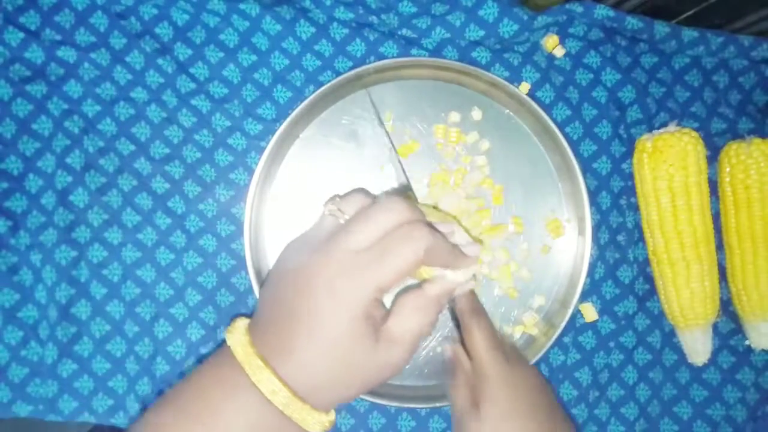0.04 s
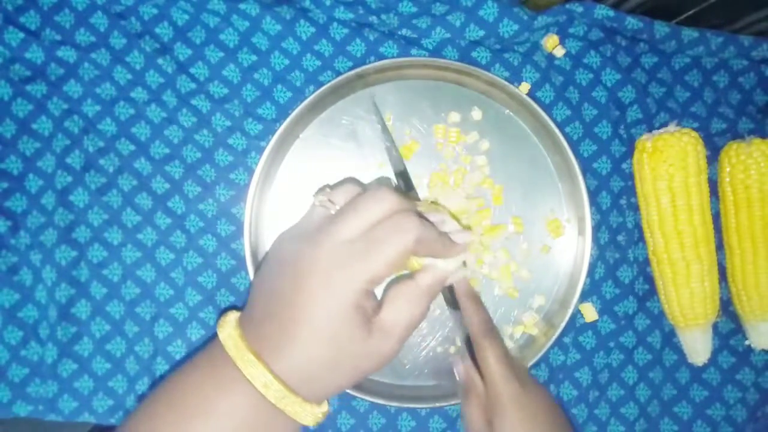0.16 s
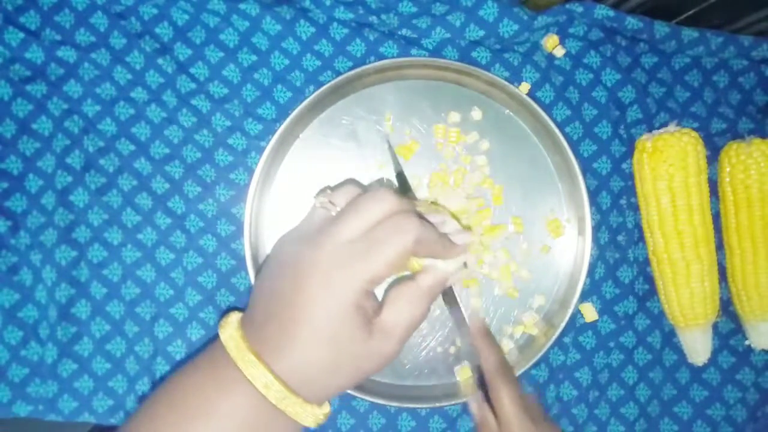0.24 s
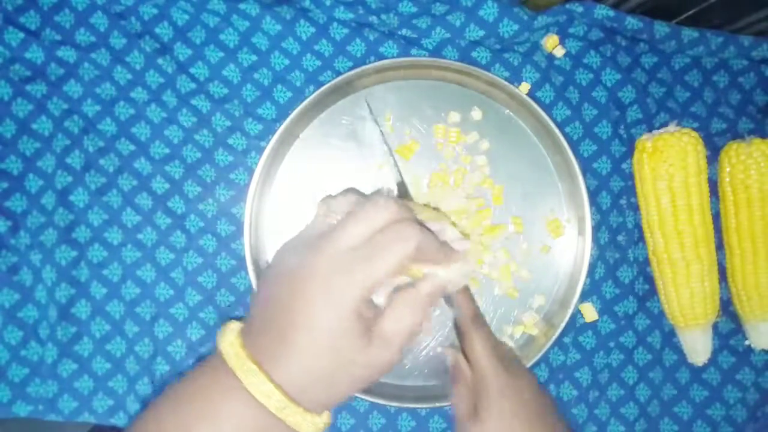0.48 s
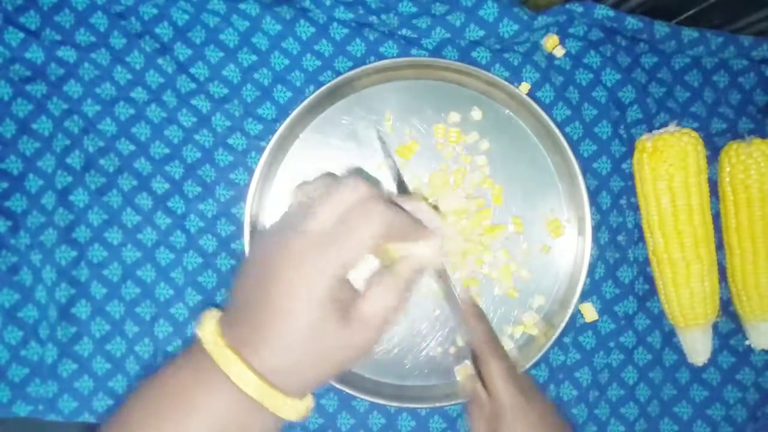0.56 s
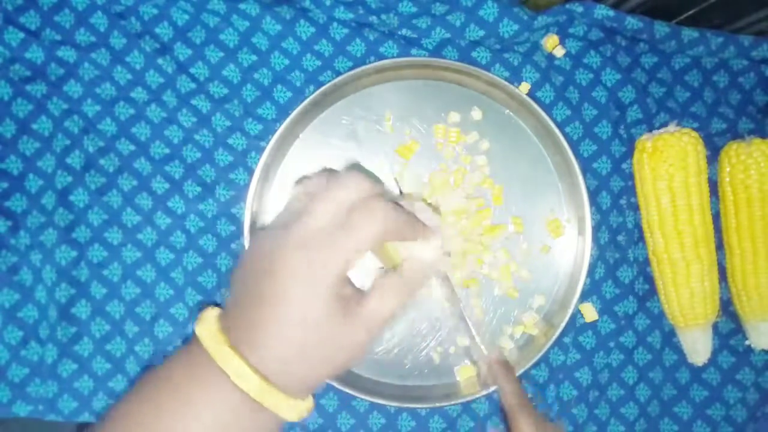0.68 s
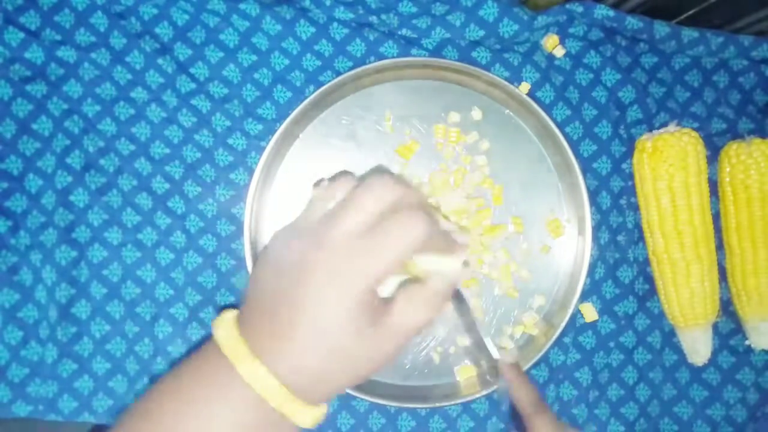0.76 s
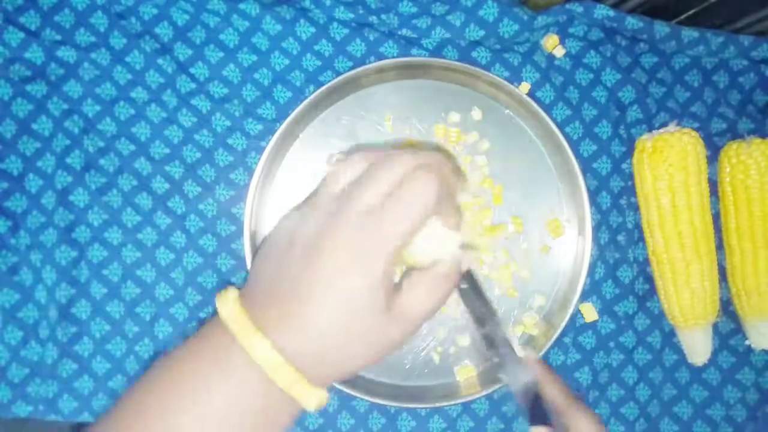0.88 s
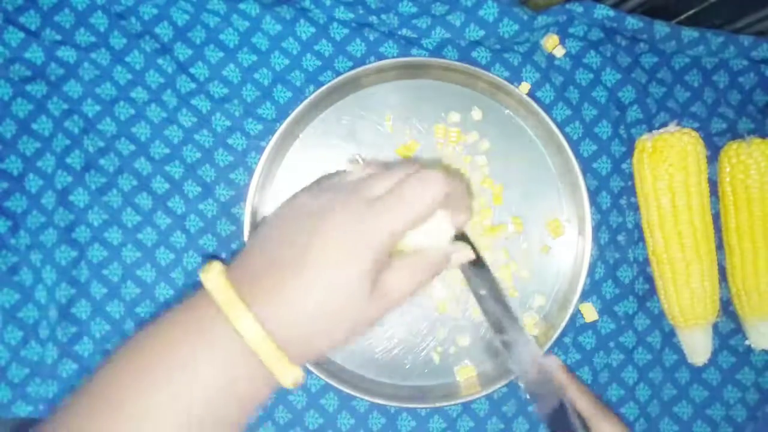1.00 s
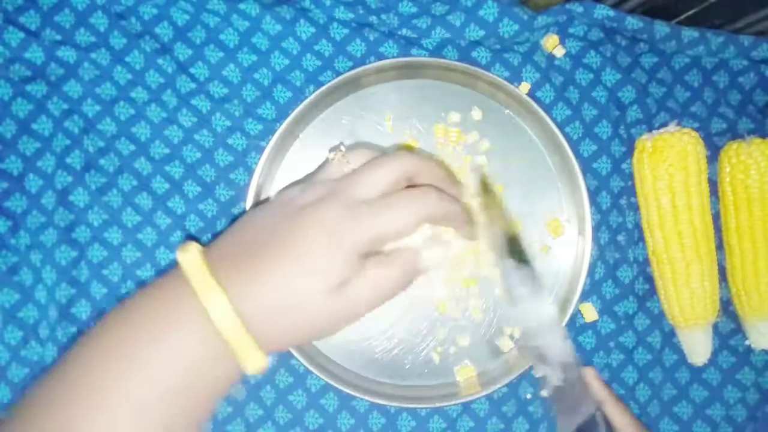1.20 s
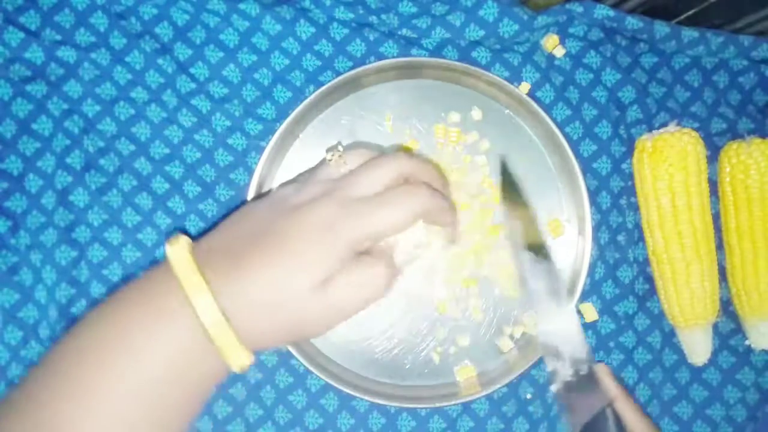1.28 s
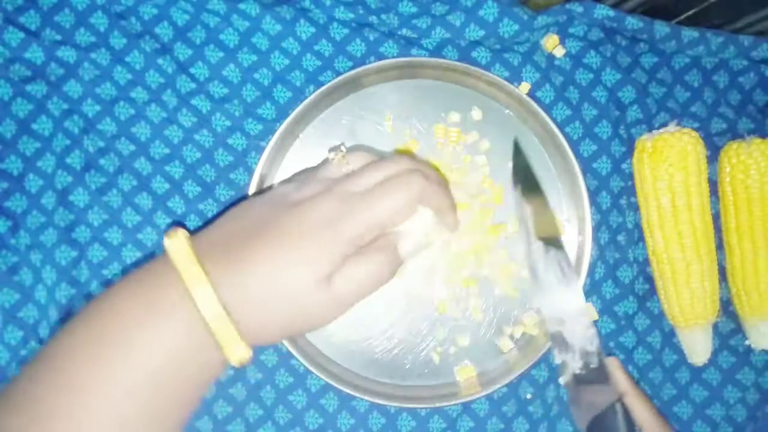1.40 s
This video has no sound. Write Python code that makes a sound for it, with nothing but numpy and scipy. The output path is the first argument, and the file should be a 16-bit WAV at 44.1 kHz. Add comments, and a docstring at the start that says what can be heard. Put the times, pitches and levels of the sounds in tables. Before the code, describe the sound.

A knife cuts corn off the cob with a wet crackle, then knocks a steel plate.

```python
"""Cutting corn off the cob

In a small kitchen, a knife is pushed down a corn cob standing on a steel plate. Fibres tear
with a wet crackle and kernels burst one after another. The blade breaks through and knocks on
the plate, which rings briefly, then the blade slides softly back. A motor hums in the room.
The microphone is close by and is bright near 8 kHz, and slightly so near 15 kHz."""
import sys
import numpy as np
from scipy import signal
from scipy.fft import rfft, irfft
from scipy.io import wavfile
from scipy.ndimage import uniform_filter1d

SR = 44100
rng = np.random.default_rng(int(sys.argv[2]) if len(sys.argv) > 2 else 0)


def log_audio(samples):
    """Write samples as a 16-bit WAV file to the path given in sys.argv[1]."""
    # one column per channel
    frames = np.atleast_2d(samples).T
    # limit to full scale, then quantise
    limited = np.clip(frames, -1, 1)
    pcm = np.round(limited * 32767).astype(np.int16)
    wavfile.write(sys.argv[1], SR, pcm)


N = 63945
T = np.arange(N) / SR
FREQS = np.fft.rfftfreq(2 * N, 1 / SR)

# Levels in the tables are relative. A "tone" says how strong each frequency is in a sound.
# how long the room's echo takes to fall by 60 dB (frequency [Hz], time [s])
ECHO_TIMES = [(200, 0.56), (1000, 0.31), (4000, 0.14), (8000, 0.33), (15000, 0.087)]
# tone of the room's low rumble (frequency [Hz], level [dB])
RUMBLE_TONE = [(25, 2), (50, -11.5), (100, -11.5), (155, 10.5), (260, -12), (450, -5.5), (2000, -89.5)]
# tone of the background hiss (frequency [Hz], level [dB])
HISS_TONE = [(120, -34.5), (280, -4.5), (450, 5), (700, -2.5), (1200, -1), (2000, -4), (2700, -11),
             (3600, -39.5), (5000, -70), (6800, -50), (8200, -21), (10000, -54), (16000, -76.5)]
# moments when the background hiss briefly drops out (start [s], end [s], level change [dB])
BACKGROUND_DIPS = [(0.129, 0.224, -25), (0.349, 0.382, -61), (0.74, 0.893, -52)]
# notes in the motor's hum (frequency [Hz], level [dB])
HUM_NOTES = [(69.6, -60.5), (99.6, -53.5), (125, -70.5), (208.3, -69), (404, -74.5), (450, -75)]
# the hum sinks briefly after the knock (time [s], level change [dB])
HUM_CHANGES = [(.575, 3), (.605, -19.5), (.74, -5), (.79, 0.5)]
# three faint, wavering bands of noise early in the cut (frequency [Hz], level [dB])
FAINT_BANDS = [(1400, 3), (2230, -0.5), (3300, 0.5)]
# how those bands swell and fade (time [s], level [dB])
FAINT_BAND_LEVELS = [(0.125, -65), (0.16, -65.5), (0.22, -56), (0.26, -91)]
# the blade tip rubbing the plate (middle [s], half length [s], level [dB], pitch [Hz])
TIP_STROKES = [(0.721, 0.013, -64.5, 1090), (0.759, 0.0037, -55.5, 1122), (0.802, 0.0081, -66, 977),
               (0.825, 0.02, -64, 1545), (0.865, 0.0075, -63.5, 1140)]
# tone of the blade sliding along the wet cob (frequency [Hz], level [dB])
SLIDE_TONE = [(700, -37.5), (1000, 7), (1600, 3), (2100, -34), (4500, -43.5), (5800, -50.5), (6800, 0),
              (8000, 4), (10500, -0.5), (12000, -3), (14000, 6), (16000, 7)]
# the cob bumping the plate (start [s], level [dB], fade time [s], pitch [Hz])
COB_BUMPS = [(.172, -39.5, 0.029, 137), (.2, -43.5, 0.016, 190), (0.267, -42.5, 0.015, 129),
             (.41, -41.5, 0.0091, 139), (.552, -50.5, 0.051, 163), (0.575, -39, 0.01, 45.2),
             (.635, -49, 0.068, 138), (1.37, -50.5, 0.014, 159)]
# fibres tearing (time [s], crisp level [dB], juicy level [dB])
TEAR_LEVELS = [(0, -52, -104), (.025, -63.5, -89), (.085, -68.5, -71.5), (0.098, -44, -58),
               (.122, -44.5, -58), (.148, -48, -75), (0.226, -46, -98), (0.257, -55.5, -56.5),
               (0.298, -57, -71), (.308, -43.5, -53.5), (0.338, -45.5, -57.5), (0.36, -46.5, -101),
               (0.38, -52, -89), (0.397, -44.5, -54.5), (0.427, -39, -53), (0.452, -47.5, -59.5),
               (.485, -61.5, -89), (.525, -54, -62.5), (.55, -44, -52.5), (0.573, -42, -46),
               (0.576, -52, -34.5), (0.588, -47, -55.5), (0.605, -40, -46), (0.633, -44.5, -46.5),
               (0.669, -72, -55.5)]
# tone of the crisp fibres (frequency [Hz], level [dB])
CRISP_TONE = [(1500, -34.5), (4800, -28.5), (7000, -1), (11000, -2), (16000, 9)]
# tone of the juicy pulp (frequency [Hz], level [dB])
JUICY_TONE = [(100, -1.5), (400, -2.5), (1300, -1), (2500, 0.5), (4800, -3), (7000, -6), (16000, -33.5)]
# kernels bursting (start [s], level [dB], fade time [s], body compared with snap [dB])
KERNEL_BURSTS = [(0.0968, -52.5, 0.0078, 4), (0.111, -40.5, 0.003, -4.5), (0.148, -51, 0.004, -26),
                 (0.171, -48, 0.004, -31), (0.174, -40, 0.0033, -28), (0.2213, -42.5, 0.0045, -26.5),
                 (0.3018, -37.5, 0.0014, -9.5), (0.305, -37, 0.002, -7), (0.351, -45, 0.003, -32),
                 (0.37, -45, 0.004, -29), (0.4037, -44, 0.001, 1), (0.4059, -38.5, 0.0019, -1.5),
                 (0.4224, -42, 0.002, -25), (0.426, -55.5, 0.002, -8), (0.4516, -51, 0.0015, -31),
                 (0.5332, -41, 0.0046, -6.5), (0.5688, -37, 0.001, -4.5), (0.5694, -33, 0.0025, -6.5)]
# tone of a kernel's wet snap (frequency [Hz], level [dB])
SNAP_TONE = [(300, -27), (1500, -29), (3000, -16), (5200, -17.5), (7000, 2), (9000, 3), (12000, -2.5),
             (16000, 6)]
# tone of the lower body under the snap (frequency [Hz], level [dB])
BODY_TONE = [(120, -21), (400, 13), (1200, 10), (2300, 9), (4000, 8.5), (6000, 1), (9000, -26.5),
             (16000, -10)]
# the blade hitting the plate (time [s], strength [dB])
BLOWS = [(0.574, -24), (0.5778, -13.5), (0.5822, 0)]
# tone of each blow's crack (frequency [Hz], level [dB])
CRACK_TONE = [(30, -13.5), (150, -19.5), (250, -3.5), (450, 8), (1150, 10.5), (2000, -2.5), (4200, -1.5),
              (6000, -3), (8000, -15), (10000, -5), (16000, 1)]
# tone of the blade's rattle (frequency [Hz], level [dB])
RATTLE_TONE = [(200, -9), (600, 4), (1200, 11.5), (2500, 2.5), (4500, -7), (6500, -4), (8500, -2),
               (12000, -2), (16000, -11)]
# notes of the plate, damped by a cloth (frequency [Hz], level [dB], time to fall 60 dB [s])
PLATE_NOTES = [(343, -44, .5), (406.3, -41, 0.34), (692, -46.5, 0.46), (832, -50.5, 0.32), (915, -46, 0.26),
               (1123, -60.5, 0.35), (1252, -49.5, 0.1), (1320, -50.5, 0.4), (1500, -49.5, 0.58),
               (1550, -47, 0.37), (1894, -46.5, 0.14), (2220, -48, 0.39), (3104, -53, 0.13),
               (3278, -48.5, 0.2)]
# tone of the knock's echo (frequency [Hz], level [dB])
KNOCK_ECHO_TONE = [(60, -28), (220, -15), (350, 1), (520, 6.5), (800, 7), (1300, 13), (2000, -0.5),
                   (3400, 4), (4500, -21), (6000, -2), (9000, -4), (11500, -14.5), (14000, -2), (16000, 0)]
# where the microphone rings (frequency [Hz], width [Hz], boost [dB])
MIC_PEAKS = [(8190, 970, 13), (15400, 1000, 1)]


def amp(db):
    """Turn decibels into a number to multiply by."""
    return 10 ** (np.asarray(db) / 20)


def unit(x):
    """Scale a signal to an average power of 1."""
    return x / np.sqrt(np.mean(x ** 2) + 1e-20)


def along(points, hz):
    """Read between the rows of a table, with every octave equally wide."""
    freqs, values = np.array(points, float).T
    return np.interp(np.log(np.maximum(hz, 1)), np.log(freqs), values)


def colour(x, tone):
    """Filter a sound to give it a tone."""
    gain = unit(amp(along(tone, FREQS)))
    # these steps make the filter ring only after a click, never before it
    cepstrum = irfft(np.log(gain))
    cepstrum[1:N] *= 2
    cepstrum[N + 1:] = 0
    return irfft(rfft(x, 2 * N) * np.exp(rfft(cepstrum)))[:N]


def resonate(x, hz, width_hz):
    """Keep the part of a sound near one pitch, so that it rings."""
    return signal.lfilter(*signal.iirpeak(hz, hz / width_hz, fs=SR), x)


def convolve(x, response):
    """Let every sample of a sound set off a copy of the response."""
    return signal.fftconvolve(x, response)[:N]


def fade(t60):
    """A level that falls by 60 dB every t60 seconds."""
    return np.exp(-np.log(1000) * T / max(t60, 1e-3))


def crackle(per_s, spread_db):
    """Many tiny clicks of uneven size at random times."""
    clicks = (rng.random(N) < per_s / SR) * rng.choice([-1, 1], N)
    return unit(clicks * amp(spread_db * np.clip(rng.standard_normal(N), -2, 2)))


def room_echo(x, build_s=0.00081):
    """The walls return a smooth echo that lasts longest in the bass."""
    noise, tail = rfft(rng.standard_normal(N), 2 * N), 0
    for band, (_, t60) in enumerate(ECHO_TIMES):
        share = along([(hz, row == band) for row, (hz, _) in enumerate(ECHO_TIMES)], FREQS)
        tail = tail + irfft(noise * share)[:N] * fade(t60)
    return convolve(x, unit(tail * (1 - np.exp(-T / build_s))) / np.sqrt(N))


def background_noise():
    """A low rumble and a soft hiss that briefly drops out now and then."""
    dip_db = sum(db * ((T > start) & (T < end)) for start, end, db in BACKGROUND_DIPS)
    dip_db = uniform_filter1d(dip_db.astype(float), size=500)  # soften the edges
    rumble = amp(-62) * colour(rng.standard_normal(N), RUMBLE_TONE)
    return rumble + amp(-60 + dip_db) * colour(rng.standard_normal(N), HISS_TONE)


def motor_hum(waver_db=2.5):
    """A motor hums on a few low notes, each wavering a little in level."""
    out = np.zeros(N)
    change_db = np.interp(T, *np.array(HUM_CHANGES).T)
    for hz, db in HUM_NOTES:
        waver = np.interp(T, np.linspace(0, T[-1], 12), rng.standard_normal(12))
        note = np.sqrt(2) * np.sin(2 * np.pi * (hz * T + rng.random()))
        out += amp(db + change_db + waver_db * waver) * note
    return out


def faint_bands(width_hz=260, wander=0.07, changes_per_s=35):
    """Early in the cut, three faint bands of noise waver near 1.4, 2.2 and 3.3 kHz."""
    noise = crackle(per_s=2000, spread_db=5)
    bands = sum(amp(db) * resonate(resonate(noise, hz, width_hz), hz, width_hz)
                for hz, db in FAINT_BANDS)
    drift = np.interp(T * changes_per_s, np.arange(N), rng.uniform(-1, 1, N))
    position = np.cumsum(1 + wander * drift)  # playing faster raises the pitch
    bands = np.interp(position, np.arange(N), bands)
    return unit(bands) * amp(np.interp(T, *np.array(FAINT_BAND_LEVELS).T, left=-120, right=-120))


def tip_rub(width_hz=140):
    """On its way back the tip drags on the steel in short strokes, each with its own pitch."""
    out = np.zeros(N)
    for middle, half_length, db, hz in TIP_STROKES:
        friction = crackle(per_s=920, spread_db=0.5)
        ringing = resonate(resonate(friction, hz, width_hz), hz, width_hz)
        swell = np.exp(-.5 * ((T - middle) / half_length) ** 2)
        out += amp(db) * unit(ringing) * swell
    return out


def blade_slide(start_s=0.757, end_s=0.888, rise_s=0.04, fall_s=0.021, sag_db_per_s=-42):
    """The blade is drawn back along the wet cob with a soft, high hiss."""
    outside = np.maximum(start_s - T, 0) / rise_s + np.maximum(T - end_s, 0) / fall_s
    level = np.exp(-outside) * amp(-54 + sag_db_per_s * (T - start_s))
    return colour(crackle(per_s=2300, spread_db=-0.5) * level, SLIDE_TONE)


def cob_bumps(rise_s=0.0033):
    """The cob gives under the blade and thuds faintly on the plate."""
    out = np.zeros(N)
    for start, db, fade_s, hz in COB_BUMPS:
        age = np.maximum(T - start, 0)
        level = amp(db) * (1 - np.exp(-age / rise_s)) * np.exp(-age / fade_s)
        out += level * np.sin(2 * np.pi * hz * age)
    return out


def tearing_fibres(clumps_per_s=220, clump_db=1.5):
    """Fibres part in small clumps of crackle as the blade moves down; the pulp adds a wetter rasp."""
    times, crisp_db, juicy_db = np.array(TEAR_LEVELS).T
    clumps = np.interp(T * clumps_per_s, np.arange(N), np.clip(rng.standard_normal(N), -2, 2))
    out = np.zeros(N)
    for db, tone in (crisp_db, CRISP_TONE), (juicy_db, JUICY_TONE):
        level = amp(np.interp(T, times, db, right=-120) + clump_db * clumps)
        out += colour(crackle(per_s=9000, spread_db=2) * level, tone)
    return out


def bursting_kernels():
    """Each kernel splits with a sharp snap and a fading run of clicks, over a lower body."""
    snaps, body = np.zeros(N), np.zeros(N)
    for start, db, fade_s, body_db in KERNEL_BURSTS:
        age = np.maximum(T - start, 0)
        clicks = crackle(per_s=9000, spread_db=1.5) * (T >= start) * np.exp(-age / fade_s)
        burst = unit(clicks) / np.sqrt(N)
        burst[int(start * SR)] += amp(-15)  # the first snap
        burst *= np.sqrt(fade_s * SR) * amp(db)  # longer bursts carry more energy
        snaps += burst
        body += burst * amp(body_db)
    return colour(snaps, SNAP_TONE) + colour(body, BODY_TONE)


def plate_knock(rattle_rise_s=0.00083):
    """The blade grazes the plate, then lands: a hard crack, a brief rattle, ringing and an echo."""
    blows = np.zeros(N)
    for start, db in BLOWS:
        blows[int(start * SR)] -= amp(db)
    crack = amp(-6.5) * colour(blows, CRACK_TONE)
    shake = rng.standard_normal(N) * fade(t60=0.027) * (1 - np.exp(-T / rattle_rise_s))
    rattle = amp(-9.5) * colour(convolve(blows, unit(shake) / np.sqrt(N)), RATTLE_TONE)
    notes = sum(amp(db) * fade(t60) * np.sin(2 * np.pi * hz * T) for hz, db, t60 in PLATE_NOTES)
    ringing = amp(-5) * convolve(blows, notes)
    echo = amp(-9.5) * colour(room_echo(blows), KNOCK_ECHO_TONE)
    return crack + rattle + ringing + echo


def scene():
    """Everything sits in the middle; the room adds a trace of stereo width."""
    cutting = amp(-4) * (bursting_kernels() + tearing_fibres())
    middle = cutting + amp(-22) * room_echo(cutting)
    middle += faint_bands() + cob_bumps() + plate_knock() + blade_slide() + tip_rub()
    short_echo = unit(rng.standard_normal(N) * fade(t60=0.018)) / np.sqrt(N)
    width = colour(convolve(middle, short_echo), [(500, -8), (5000, 11)])  # mostly treble
    side = amp(-20) * (width + background_noise())  # added on the left, taken away on the right
    return middle + background_noise() + motor_hum() + np.array([side, -side])


def record(dry, top_hz=15700):
    """The microphone's opening rings in the treble; the very highest sounds are cut off steeply."""
    bright = dry + sum((amp(db) - 1) * resonate(dry, hz, width) for hz, width, db in MIC_PEAKS)
    return signal.sosfilt(signal.ellip(10, .2, 80, top_hz, fs=SR, output="sos"), bright)


dry = scene()
out = record(dry)
log_audio(out)
```